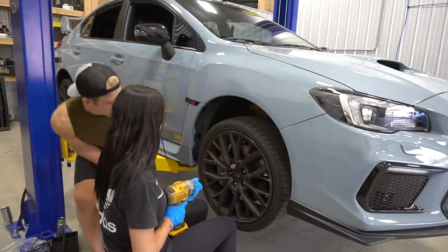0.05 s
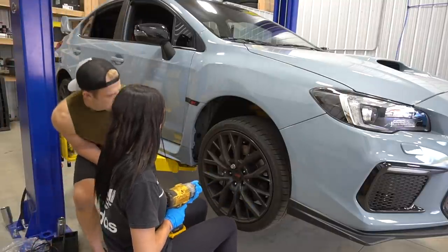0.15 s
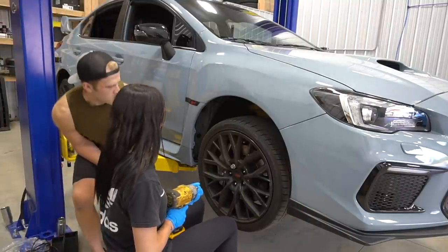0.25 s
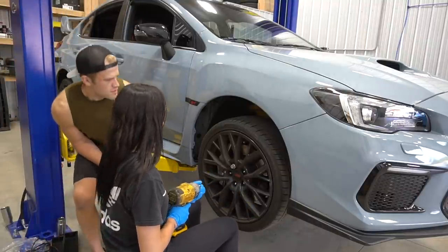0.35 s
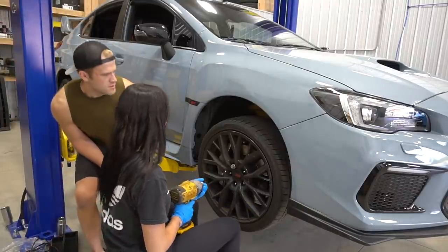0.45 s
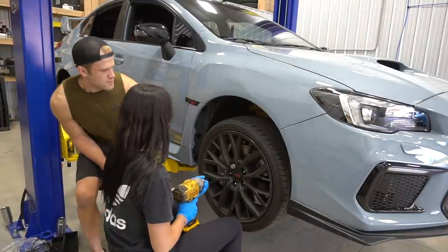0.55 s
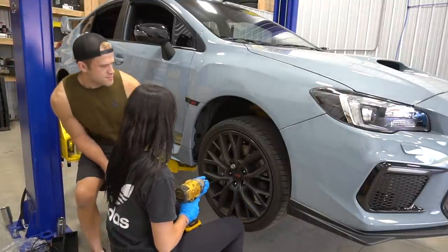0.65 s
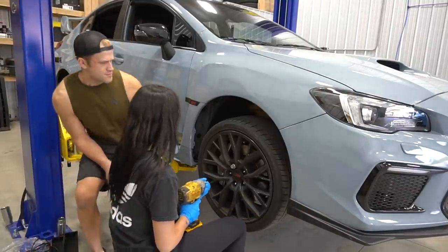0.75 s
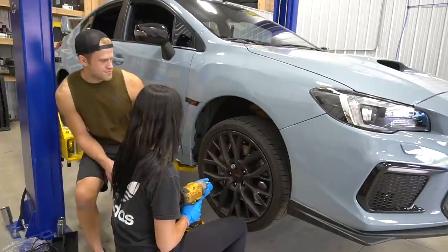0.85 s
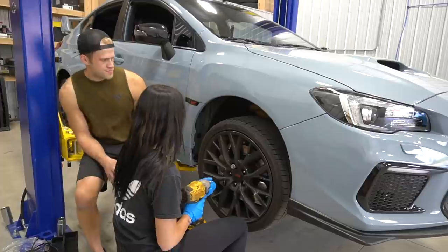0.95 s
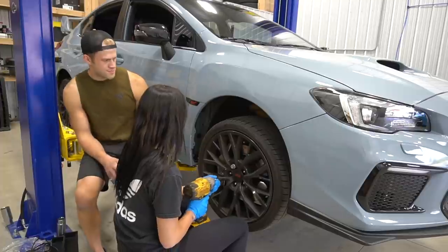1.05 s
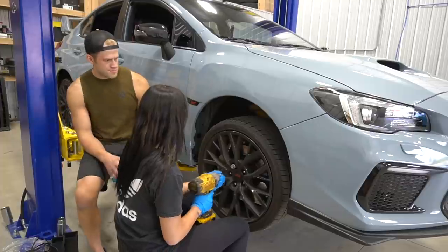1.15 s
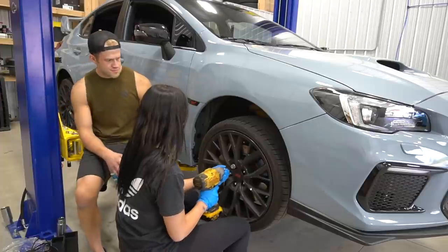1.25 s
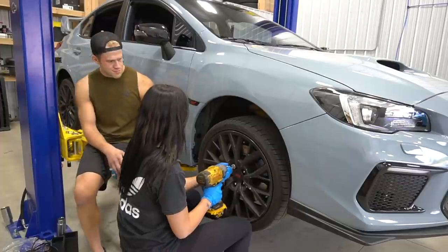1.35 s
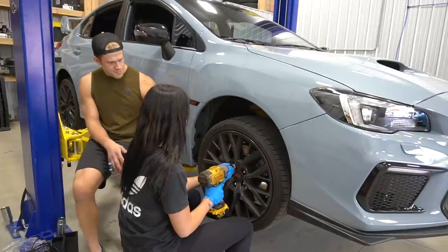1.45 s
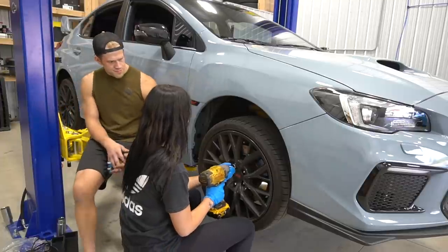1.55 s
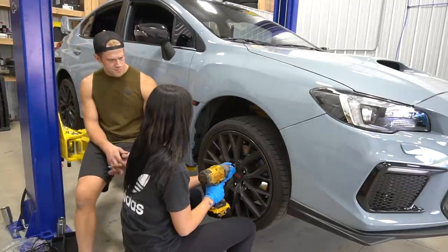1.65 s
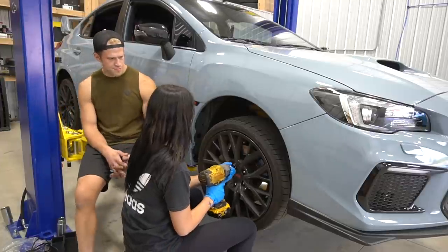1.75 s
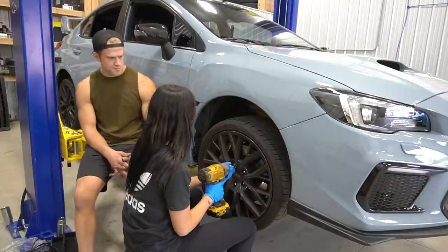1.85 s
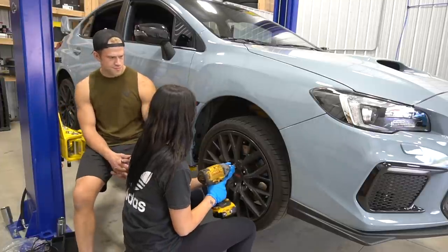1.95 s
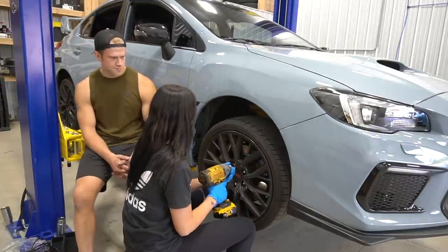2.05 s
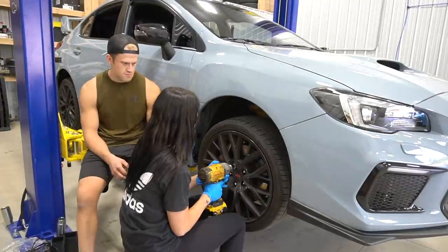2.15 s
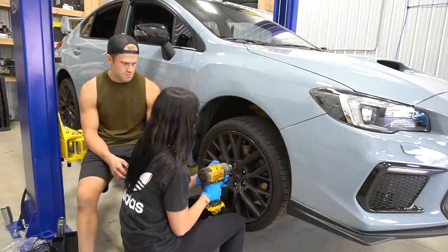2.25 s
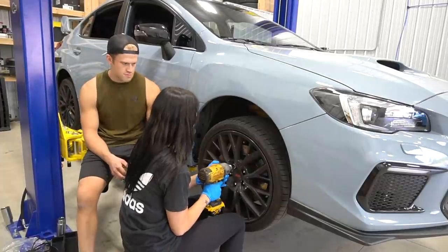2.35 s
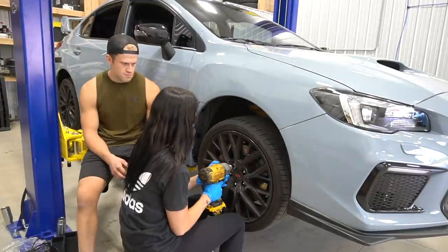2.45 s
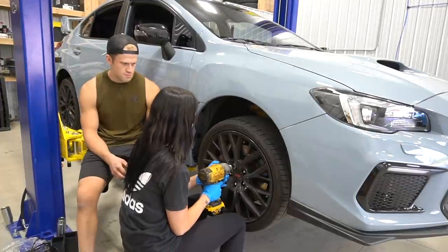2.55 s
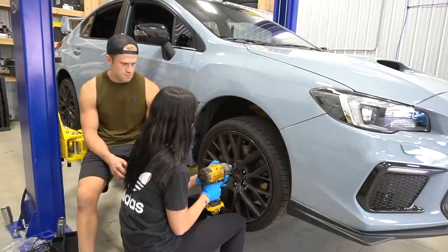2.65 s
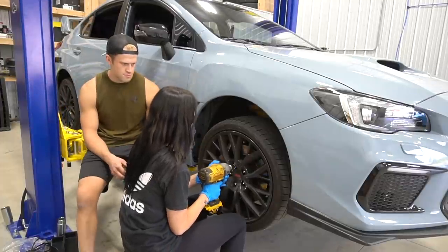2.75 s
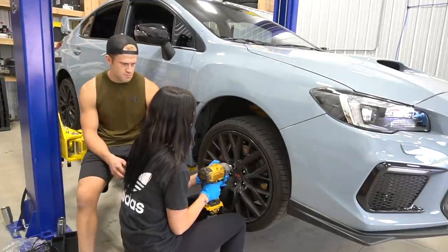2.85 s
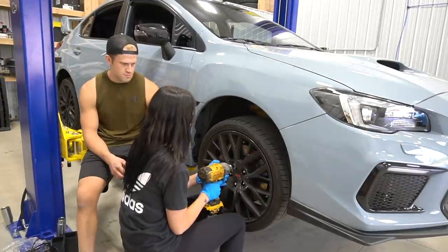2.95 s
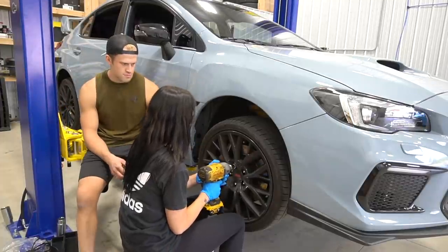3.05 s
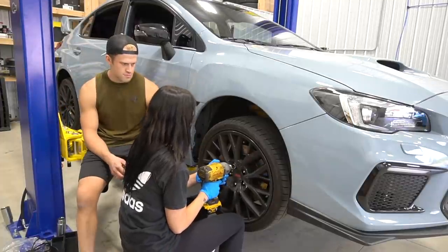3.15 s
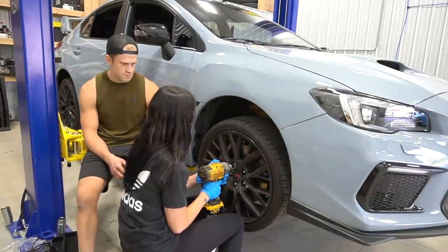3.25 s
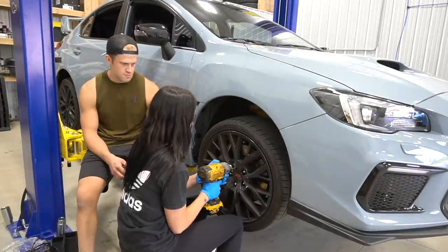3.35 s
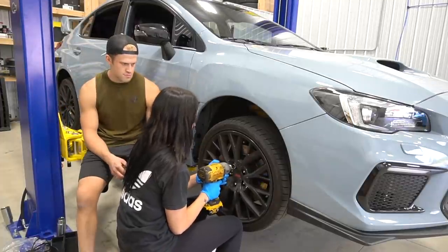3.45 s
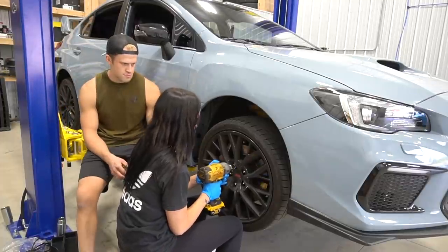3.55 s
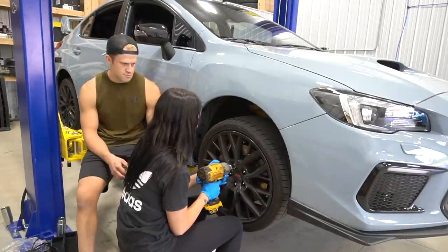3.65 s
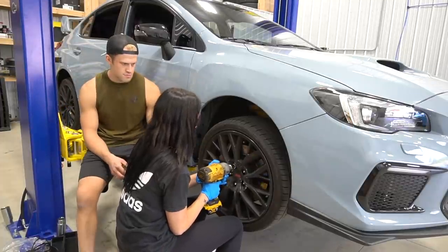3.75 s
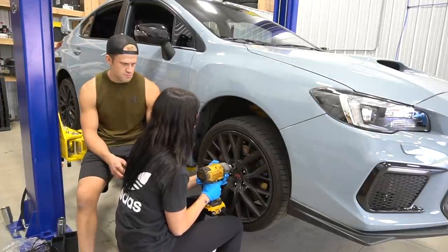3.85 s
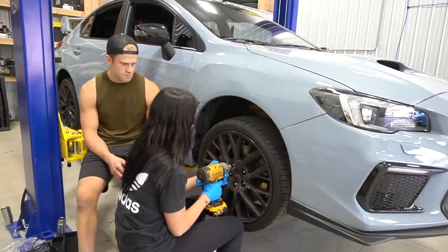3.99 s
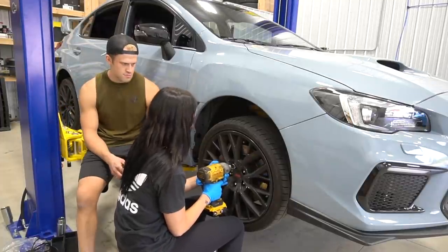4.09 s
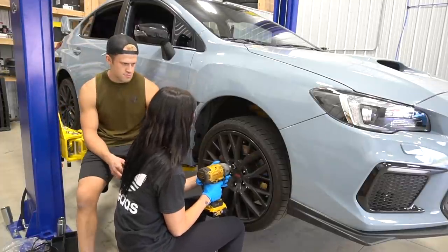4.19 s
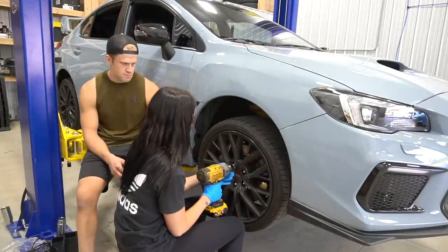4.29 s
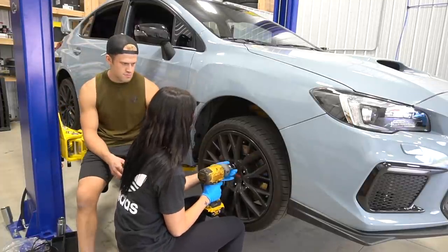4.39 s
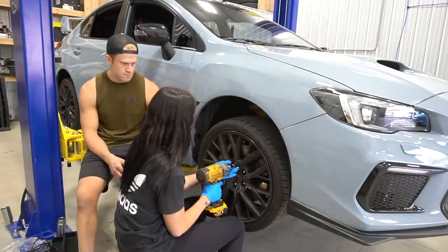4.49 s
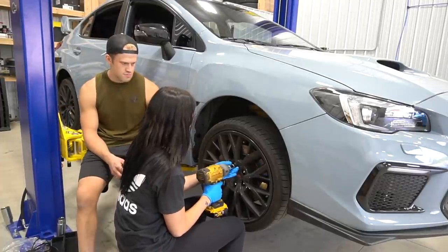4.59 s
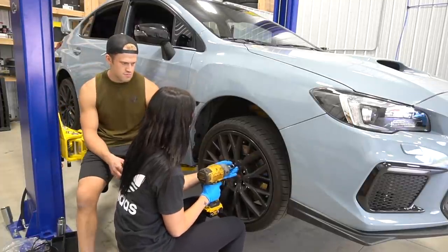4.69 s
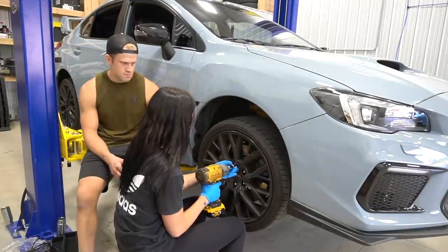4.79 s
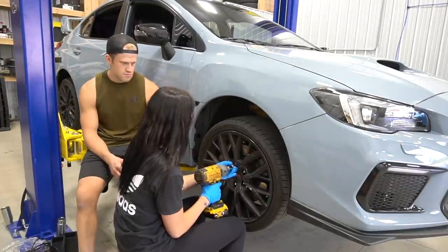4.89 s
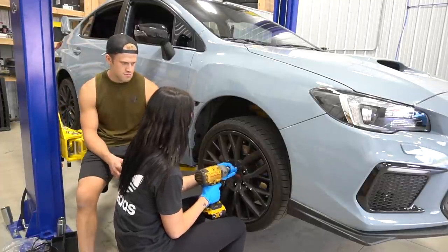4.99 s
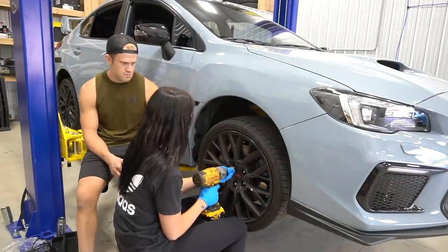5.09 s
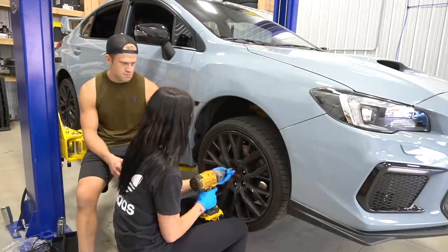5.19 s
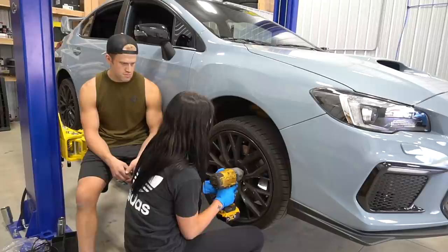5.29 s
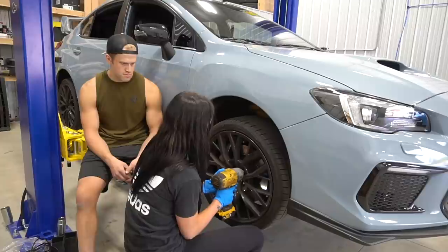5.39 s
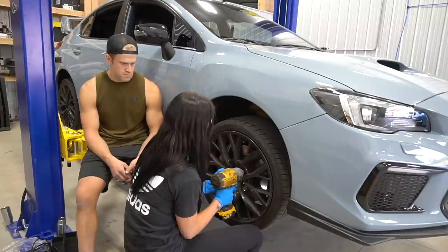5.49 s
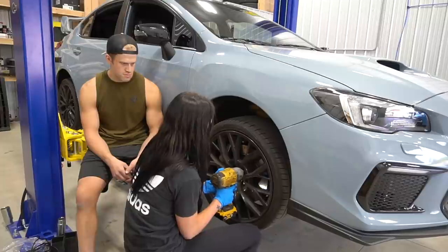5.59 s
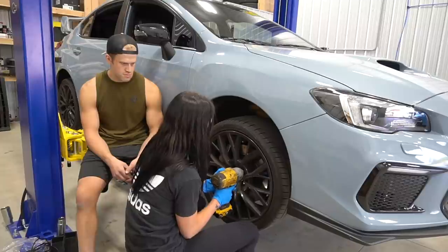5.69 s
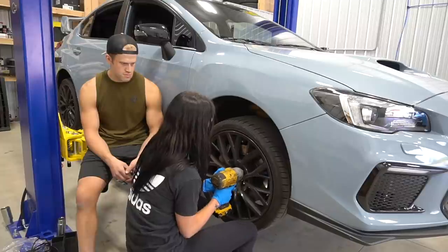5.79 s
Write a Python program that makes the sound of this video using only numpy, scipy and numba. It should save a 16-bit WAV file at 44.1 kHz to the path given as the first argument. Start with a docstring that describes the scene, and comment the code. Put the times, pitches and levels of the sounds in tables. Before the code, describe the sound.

Soft shuffling and small metal clinks come first, over the dying ring of struck steel. A cordless impact wrench then loosens lug nuts in three rapid, cracking bursts, the second the longest. Between the last two, its motor whirrs briefly, a loose nut spins and the socket taps the wheel. The work sits centered in front of a stereo microphone, and each burst echoes around a big garage.

```python
"""Struck steel rings away in a large, hard-walled garage; shoes scuff and a socket scrapes on a wheel.
Then, straight ahead of a stereo microphone, a cordless impact wrench hammers lug nuts loose in three
bursts. Each blow cracks through the socket and rings the wheel; between bursts the motor whirrs, a freed
nut spins off its stud and the tool knocks against the wheel. Gain control holds the bursts down."""
import sys
import numpy as np
from scipy import signal
from scipy.fft import rfft, irfft
from scipy.io import wavfile
from scipy.ndimage import uniform_filter1d
from numba import njit

SR = 44100
rng = np.random.default_rng(int(sys.argv[2]) if len(sys.argv) > 2 else 0)


def inscribe(sig):
    """Save sig as 16-bit PCM at rate SR to the path in sys.argv[1].

    A 1-D sig is mono; a 2-D sig holds one channel per row.
    Samples are clipped to [-1, 1] before scaling.
    """
    pcm = np.round(np.clip(np.atleast_2d(sig).T, -1, 1) * 32767)
    wavfile.write(sys.argv[1], SR, pcm.astype(np.int16))


N = 257103
T = np.arange(N) / SR

# stretches of hammering: start_s, end_s, blows_per_s, level_db, wheel_body_db, wheel_hum_db
HAMMER_BURSTS = [(2.396, 2.705, 72, -13.3, -0.5, -12), (3.243, 3.635, 72, -11, -0.2, 1),
                 (3.68, 3.905, 40, -9.5, -1.5, 0), (5.461, 5.692, 80, -12.5, -4.5, 4)]
# blows where the hammer catches the anvil squarely: start_s, level_db
SQUARE_BLOWS = [(2.3955, -8.5), (2.4171, -10), (2.4451, -9), (2.5378, -6.5), (2.5882, -7), (2.6464, -8),
                (3.2397, -8), (3.4295, -10), (3.5375, -5.5), (3.5953, -6), (3.6748, -4.5), (3.7398, -5.5),
                (3.7758, -7), (3.8033, -5.5), (3.8301, -7), (3.8602, -10.5), (5.46, -12.5), (5.4921, -8.5),
                (5.6703, -9.5)]
# colour of a blow: pitch_hz, level_db
CRACK_SPECTRUM = [(40, -48), (130, -23.5), (190, -17.5), (400, 5.5), (600, -1.5), (900, 4), (1250, 1),
                  (1600, 5), (2300, 6), (3300, 3.5), (4800, 3), (6500, 3.5), (10000, 4.5), (13000, 0.5),
                  (16000, -2)]
# what wheel, socket and suspension ring with: pitch_hz, level_db, t60_s
WHEEL_MODES = [(255.8, -34, 7.2), (528, -28.5, 3.9), (222, -31, 0.79), (290.3, -21.5, 0.15),
               (426, -22, 0.14), (469.6, -16.5, 0.49), (662, -24.5, 0.33), (816, -16.5, 0.03),
               (959, -22, 0.43), (1480, -19, 0.22), (1587, -11.5, 0.96), (2070, -26, 0.7),
               (2358, -14.5, 0.066), (2484, -13, 0.15), (3200, -7, 0.015), (4074, -12.5, 0.063),
               (4620, -10.5, 0.083)]
# shudder of tyre and suspension: pitch_hz, level_db
SHUDDER_SPECTRUM = [(20, -21), (40, -0.5), (65, -3), (130, 9), (200, -4), (400, -19), (2000, -52)]
# the drive takes up its slack before the hammering: clack_s, bite_s, level_db
SLACK_TAKE_UPS = [(2.349, 2.381, -22), (3.197, 3.225, -19), (5.395, 5.439, -18)]
# pulls of the trigger: start_s, length_s, full_speed_db
TRIGGER_PULLS = [(2.297, 0.49, -29.5), (3.165, 0.68, -31.5), (4.385, 0.053, -30.5), (4.618, 0.14, -35),
                 (4.96, 0.092, -38.5), (5.371, .45, -29.5)]
# a freed nut runs along its stud: start_s, length_s, level_db
NUT_SPINS = [(2.67, 0.085, -32), (4.425, 0.085, -43.5), (4.69, 0.2, -37), (5.017, 0.036, -53),
             (5.656, 0.092, -25.5)]
# the nut rattling in the socket: pitch_hz, level_db
RATTLE_SPECTRUM = [(60, -41), (250, -10), (550, -11.5), (850, -2.5), (1300, -3.5), (2500, 2), (3300, 0),
                   (5500, 0.5), (8000, -3), (12000, -10.5), (14500, -11), (16000, -14)]
# light knocks of tool, socket and nut, and the tick of the gears catching at two trigger pulls: start_s,
# level_db, pitch_hz, width_hz
TOOL_KNOCKS = [(.601, -35, 420, 300), (1.037, -40.5, 795, 1200), (1.296, -39.5, 750, 1200),
               (1.585, -25, 4540, 1980), (1.622, -30.5, 2500, 3000), (1.706, -30, 700, 1600),
               (2.009, -31.5, 4500, 3000), (2.299, -46, 3400, 800), (4.631, -35, 6460, 7000),
               (4.918, -24.5, 4470, 9000), (5.052, -18.5, 5350, 12000), (5.067, -27, 9000, 12000),
               (5.156, -38, 9500, 2500), (5.365, -39, 3500, 700), (5.429, -10.5, 2400, 1020)]
# dull thuds of the tyre and the car's body: start_s, level_db, pitch_hz, t60_s
TYRE_THUDS = [(0.605, -39.5, 131, 0.054), (1.59, -60, 97, 0.55), (1.741, -42, 97, 0.26),
              (2.719, -58, 115.8, .25), (3.91, -44, 52.15, 0.21), (3.95, -49, 85, .15),
              (5.356, -46, 122, 0.13)]
# the socket feels about on the wheel for a nut: start_s, length_s, level_db
SOCKET_SCRAPES = [(1.22, 0.36, -57), (1.52, 0.27, -48.5), (1.766, 0.25, -61.5)]
# resonances of the scraped socket: pitch_hz, width_hz, level_db
SOCKET_MODES = [(800, 210, -9.5), (2020, 450, -2), (4760, 500, -21)]
# the mechanic shifts about: start_s, length_s, scuff_db, swish_db
BODY_MOVES = [(-.1, 0.41, -56.5, -52), (0.453, 0.094, -58, -48), (1.007, 0.22, -64.5, -67),
              (1.262, 0.26, -59, -67), (1.463, 0.16, -53, -53.5), (1.765, .19, -54.5, -73),
              (2.074, 0.037, -57, -51)]
# shoes on the floor: pitch_hz, level_db
SCUFF_SPECTRUM = [(40, 3), (100, 10.5), (180, -2), (400, 2.5), (800, 3), (1300, 0.5), (1750, 1), (2100, 5),
                  (2600, 1.5), (4500, -6), (7000, -14), (16000, -7)]
# rubbing cloth: pitch_hz, level_db
SWISH_SPECTRUM = [(100, -14), (1500, 0), (4000, 6), (8000, 1), (16000, -11.5)]
# a steel part, struck a moment earlier: pitch_hz, level_db, t60_s
STEEL_MODES = [(473, -61, 3.4), (2536, -48, 1.4), (2624, -38.5, 1.12), (2810, -51, 1.1)]
# its wash of echo off the walls: pitch_hz, level_db
WASH_SPECTRUM = [(60, -25), (500, -17), (1200, -8.5), (1800, -11), (2600, -5.5), (3500, -8), (5000, -10.5),
                 (7500, -15), (9500, -6.5), (12000, -28), (16000, -39)]
# the garage's echo at the microphone: pitch_hz, t60_s, level_db, side_against_mid_db
GARAGE_BANDS = [(60.3, 2.7, -30, -7), (248, 0.51, 0.5, -16.5), (468, 1.21, -1, -16.5),
                (930, 1.15, 0, -10.5), (2010, 1.64, 0.5, -8.5), (3330, 1.49, -1, -3),
                (5550, 1.29, -2.5, -2), (8150, 0.75, -4.5, 0), (11750, 0.44, -6, -1), (16000, 0.3, -7, -10)]
# room tone of still air: pitch_hz, level_db
AIR_SPECTRUM = [(25, -18), (90, 6.5), (220, 2), (400, 2.5), (1000, -21), (2000, -11), (6000, -53),
                (16000, -35)]

BREAKS_S = [2.222, 5.352]  # here the ringing and echo of the work stop short


def wrench(body_hz=606):
    """The hammering: cracks heard directly, pushes passed to the wheel, and the gain of the wheel's hum."""
    pushes, chatter = hammer()
    body_gain, hum_gain = grip()
    cracks = colour(chatter, CRACK_SPECTRUM)
    # below body_hz a blow reaches the microphone mostly through the wheel
    lows = signal.lfilter(*signal.butter(1, body_hz, fs=SR), cracks)
    return cracks + (body_gain - 1) * lows, pushes * body_gain, hum_gain


def hammer(force_db=3, rise_s=0.00026, snap_t60_s=0.0036, size=4096, count=128):
    """Each blow is one push on the stud, heard as a hard snap and a brief chatter of socket on nut."""
    pushes, chatter, t = np.zeros(N), np.zeros(N), T[:size]
    attack = np.minimum(t / rise_s, 1) ** 2
    clinks_hz = rng.uniform(1900, 5200, count)  # the socket seats differently every time
    for (s, db, t60), hz, signs in zip(blows(), clinks_hz, rng.choice([-1, 1], (count, size))):
        shape = undb(db + force_db) * attack * (fade(t, t60) + fade(t, snap_t60_s)) / 2
        crack = shape * signs
        clink = 2.2 * resonate(crack, hz, width=450)
        add(chatter, s, crack + clink)
        add(pushes, s, [np.linalg.norm(shape) * signs[0]])  # the socket rocks either way
    return pushes, chatter


def blows(square_t60_s=0.039, glancing_t60_s=0.032, scatter_beats=0.26, scatter_db=1.1):
    """Rows of start_s, level_db, t60_s: uneven glancing blows, giving way wherever a square one lands."""
    rows = [(s, db, square_t60_s) for s, db in SQUARE_BLOWS]
    for start, end, rate, db, *_ in HAMMER_BURSTS:
        for beat, (late, force) in enumerate(rng.standard_normal((40, 2))):
            s = start + max(beat + scatter_beats * late, 0) / rate
            if s < end and all(abs(s - square_s) * rate > .5 for square_s, _ in SQUARE_BLOWS):
                rows.append((s, db + scatter_db * force, glancing_t60_s))
    return rows


def grip(lead_s=0.05):
    """How firmly the nut of each burst passes the blows into the wheel: gains of its body and its hum."""
    gains = np.ones((2, N))
    for start, *_, body_db, hum_db in HAMMER_BURSTS:
        gains[:, T > start - lead_s] = undb([[body_db], [hum_db]])
    return gains


def wheel(pushes, hum_gain, ring_db=-5):
    """The blows set the wheel's modes ringing; the slowest to fade gather energy and hum for seconds."""
    response, hum = 0, 0
    for hz, db, t60 in WHEEL_MODES:
        tone = undb(db + ring_db) * np.cos(2 * np.pi * hz * T)
        decay = fade(T, t60)
        decay *= np.sqrt(2 / np.sum(decay ** 2))
        if t60 > 2:
            energy = np.abs(convolve((hum_gain * pushes) ** 2, decay ** 2))
            hum += tone * np.sqrt(energy)
        else:
            response += tone * decay
    return convolve(pushes, response) + hum


def shudder(pushes, level_db=-20, t60=0.38):
    """Tyre and suspension rumble under the blows."""
    energy = np.abs(convolve(pushes ** 2, fade(T, t60))) / (t60 * SR)
    return undb(level_db) * np.sqrt(energy) * unit(colour(rng.standard_normal(N), SHUDDER_SPECTRUM))


def take_up():
    """The drive clacks into the socket, then the socket bites on the nut."""
    out = np.zeros(N)
    for clack_s, bite_s, db in SLACK_TAKE_UPS:
        out += contact(clack_s, db, hz=2310, width=6800, t60=0.035)
        out += contact(bite_s, db + 0.5, hz=1690, width=2300, t60=0.15)
    return out


def motor(gear_hz=3080, gear_width_hz=1130, whirr_db=-3):
    """Gear teeth tick into the ringing gearcase over a broad whirr; each pull spins up and coasts down."""
    teeth = grains(per_s=9000)
    gears = unit(ring_band(teeth, gear_hz, gear_width_hz))
    whirr = unit(resonate(resonate(teeth, hz=1400, width=3000), hz=1370, width=3530))
    return swells(TRIGGER_PULLS, rise_s=0.16, t60=0.42) * (gears + undb(whirr_db) * whirr)


def loose_nut(turn_hz=31, throb_db=2.5):
    """The nut rattles on its thread, a little harder once a turn."""
    throb = undb(throb_db * np.sin(2 * np.pi * turn_hz * T))
    rattle = colour(grains(per_s=4000, spread_db=1.9), RATTLE_SPECTRUM)
    return swells(NUT_SPINS, rise_s=0.017, t60=0.12) * throb * rattle


def socket_on(start_s=1.736):
    """The socket is shoved on to a nut: a short scrape, a clank and a thump of the wheel behind it."""
    clank = contact(start_s, db=-20.5, hz=2300, width=3900, t60=0.066, rise_s=0.0042)
    thump = contact(start_s, db=-30.5, hz=378, width=190, t60=0.084)
    return clank + thump


def knocks(t60_at_1khz=0.046, damping=0.58):
    """Tool, socket and nut knock lightly, and the gears tick as they catch: the brighter the knock, the shorter
    its ring."""
    return sum(contact(s, db, hz, width, t60_at_1khz * (1000 / hz) ** damping)
               for s, db, hz, width in TOOL_KNOCKS)


def thuds(rise_s=0.005):
    """Soft, low swings of the tyre as the tool is pressed on and kicks."""
    out, t = np.zeros(N), T[:SR]
    attack = np.minimum(t / rise_s, 1)
    for s, db, hz, t60 in TYRE_THUDS:
        add(out, s, undb(db) * attack * fade(t, t60) * np.sin(2 * np.pi * hz * t))
    return out


def scraping():
    """Tiny slips of steel on steel ring the socket."""
    slips = grains(per_s=3000)
    ring = sum(undb(db) * unit(ring_band(slips, hz, width)) for hz, width, db in SOCKET_MODES)
    return ring * swells(SOCKET_SCRAPES, rise_s=0.045, t60=0.4)


def shifting(idle_scuff_db=-63.5, idle_swish_db=-71.5):
    """Shoes scuff the floor and cloth swishes, faintly even between moves."""
    swish = colour(grains(per_s=16000), SWISH_SPECTRUM)
    scuff = colour(grains(per_s=9000), SCUFF_SPECTRUM)
    out = undb(idle_scuff_db) * scuff + undb(idle_swish_db) * swish
    for s, length, scuff_db, swish_db in BODY_MOVES:
        move = swell(s, length, rise_s=0.063, t60=0.37)
        out += move * (undb(scuff_db) * scuff + undb(swish_db) * swish)
    return out


def steel(garage, wash_db=-40, waver_hz=70):
    """The last of a clang: a few partials that waver in the garage's wash."""
    ring = 0
    for hz, db, t60 in STEEL_MODES:
        echoes = unit(resonate(resonate(rng.standard_normal(N), hz, waver_hz), hz, waver_hz))
        ring += undb(db) * fade(T, t60) * (np.sin(2 * np.pi * hz * T) + echoes)
    tails = [np.pad(side, (0, N))[SR // 20:][:N] for side in garage]  # already 50 ms into the echo
    wash = np.array([colour(tail, WASH_SPECTRUM) for tail in tails])
    return ring + undb(wash_db) * wash / np.std(wash[:, :SR // 10])


def in_garage(sound, echo_db, wide_db=0):
    """The source straight ahead of the microphone, plus the echoes that belong to its own spot."""
    return sound + undb(echo_db) * np.array([convolve(sound, side) for side in garage_response(wide_db)])


def garage_response(wide_db, gap_s=0.0055, build_s=0.0029):
    """Diffuse stereo echoes: treble dies first; bass is alike on both sides unless wide_db spreads it."""
    hz, t60s, dbs, side_dbs = np.transpose(GARAGE_BANDS)
    log_hz = np.log(np.fft.rfftfreq(2 * SR, 1 / SR) + 1)
    noise = rfft(rng.standard_normal((2, 2 * SR)))
    out, t = 0, T[:2 * SR]
    for band, t60, db, side_db in zip(np.eye(len(hz)), t60s, dbs, side_dbs):
        mid, side = irfft(noise * np.interp(log_hz, np.log(hz), band))
        shape = np.clip((t - gap_s) / build_s, 0, 1) * fade(t, t60)
        spread = undb(side_db + wide_db * np.clip(-side_db / 16, 0, 1))
        out += undb(db) * shape / np.linalg.norm(shape) * (mid + spread * np.outer([1, -1], side))
    return out


def room_tone(level_db=-67.5):
    """The low, steady hush of the garage's air."""
    return undb(level_db) * colour(rng.standard_normal(N), AIR_SPECTRUM)


def contact(s, db, hz, width, t60, rise_s=0.00036, size=8192):
    """A single contact: a scrape into place, then a damped ring."""
    out, t = np.zeros(N), T[:size] - T[size // 8]
    shape = np.exp(np.minimum(t, 0) / rise_s) * fade(np.maximum(t, 0), t60)
    ring = ring_band(rebounds(shape), hz, width)
    add(out, s + t[0], undb(db) / 2 * ring * np.linalg.norm(shape) / np.linalg.norm(ring))
    return out


def rebounds(shape):
    """Many tiny rebounds under an envelope, evenly spread over all pitches."""
    x = shape * rng.standard_normal(len(shape))
    for _ in range(2):
        even = irfft(np.exp(1j * np.angle(rfft(x))))
        x = even * np.minimum(4 * shape / shape.max(), 1)
    return x * np.linalg.norm(shape) / np.linalg.norm(x)


def grains(per_s, spread_db=2):
    """Tiny contacts at random moments, most weak and a few strong."""
    ticks = (rng.random(N) < per_s / SR) * rng.standard_normal(N)
    return unit(ticks * undb(spread_db * rng.standard_normal(N)))


def swell(start, length, rise_s, t60):
    """Envelope that climbs towards 1 while an action lasts, then dies away."""
    climb = 1 - np.exp(-np.clip(T - start, 0, length) / rise_s)
    return climb * fade(np.maximum(T - start - length, 0), t60)


def swells(actions, rise_s, t60):
    """One envelope for several actions, each at its own level."""
    return sum(undb(db) * swell(s, length, rise_s, t60) for s, length, db in actions)


def colour(x, points, size=2048):
    """Causal filter through points of pitch_hz, level_db; white noise keeps its power."""
    hz, db = np.transpose(points)
    log_hz = np.log(np.fft.rfftfreq(size, 1 / SR) + 1)
    gain = undb(np.interp(log_hz, np.log(hz), db))
    cepstrum = irfft(np.log(unit(gain)))
    cepstrum[1:size // 2] *= 2
    cepstrum[size // 2 + 1:] = 0
    return convolve(x, irfft(np.exp(rfft(cepstrum))))


def resonate(x, hz, width):
    """One resonance, its width in Hz."""
    return signal.lfilter(*signal.iirpeak(hz, hz / min(width, SR / 3), fs=SR), x)


def ring_band(x, hz, width):
    """A resonance with steeper skirts: a wide one, then a narrow one."""
    return resonate(resonate(x, hz, 2 * width), hz, width)


def convolve(x, response):
    """Play x through an impulse response."""
    return signal.fftconvolve(x, response)[:N]


def fade(t, t60):
    """Exponential decay, 60 dB down after t60 seconds."""
    return np.exp(-np.log(1000) * t / t60)


def add(track, s, sound):
    """Mix a sound in at time s."""
    i = max(int(s * SR), 0)
    track[i:i + len(sound)] += sound[:N - i]


def undb(db):
    """Decibels to gain."""
    return 10 ** (np.asarray(db) / 20)


def unit(x):
    """Scale to rms 1."""
    return x / np.sqrt(np.mean(x ** 2))


def scene():
    """Work at the wheel in three stretches, over the fading steel and the room tone."""
    cracks, pushes, hum_gain = wrench()
    contacts = socket_on() + knocks() + take_up()
    running = motor() + loose_nut()
    handling = thuds() + scraping() + shifting() * (T < BREAKS_S[0])
    out, edges = np.zeros((2, N)), [0, *BREAKS_S, N / SR]
    for start, end in zip(edges, edges[1:]):
        during = (T >= start) & (T < end)
        hammering = cracks * during + wheel(pushes * during, hum_gain) + shudder(pushes * during)
        out += during * in_garage(hammering, echo_db=1)
        out += during * in_garage(contacts * during, echo_db=-1)
        out += during * in_garage(running * during, echo_db=1)
        out += during * in_garage(handling * during, echo_db=2, wide_db=12)
    return out + steel(garage_response(wide_db=-1)) + room_tone()


@njit
def follow(x, release):
    """Level detector: jumps up at once and sinks slowly."""
    out, level = np.empty(len(x)), 0.
    for i in range(len(x)):
        level = max(x[i], level * release)
        out[i] = level
    return out


def record(dry, threshold_db=-16.5, ratio=2, release_s=0.16, window=132, top_hz=15900):
    """The microphone's gain control holds the bursts down and lets their echo swell; the top is cut."""
    loudness = np.sqrt(np.abs(uniform_filter1d(np.mean(dry ** 2, axis=0), window)))
    level = follow(loudness, np.exp(-1 / (release_s * SR)))
    over = np.maximum(level / undb(threshold_db), 1)
    gain = uniform_filter1d(over ** (1 / ratio - 1), window)
    return signal.sosfilt(signal.ellip(10, .1, 80, top_hz, fs=SR, output="sos"), dry * gain)


dry = scene()
out = record(dry)
inscribe(out)
```